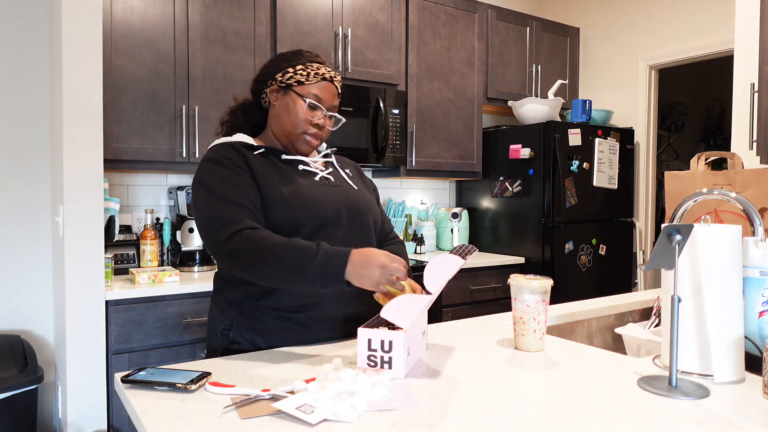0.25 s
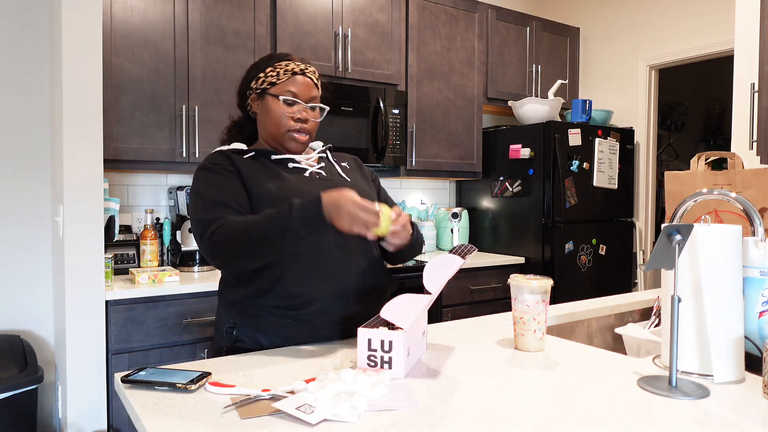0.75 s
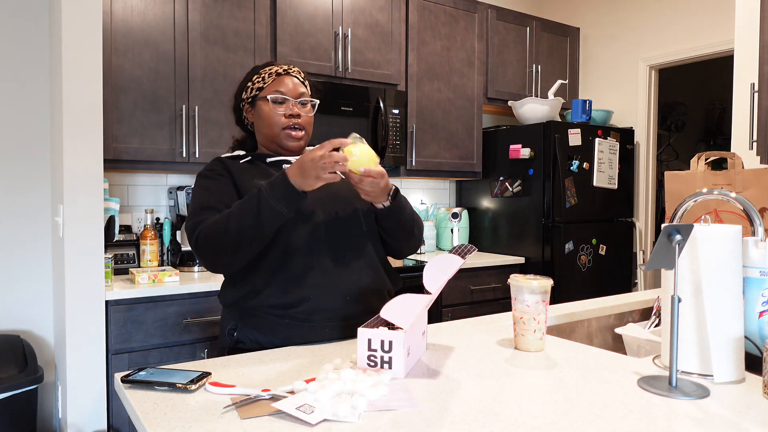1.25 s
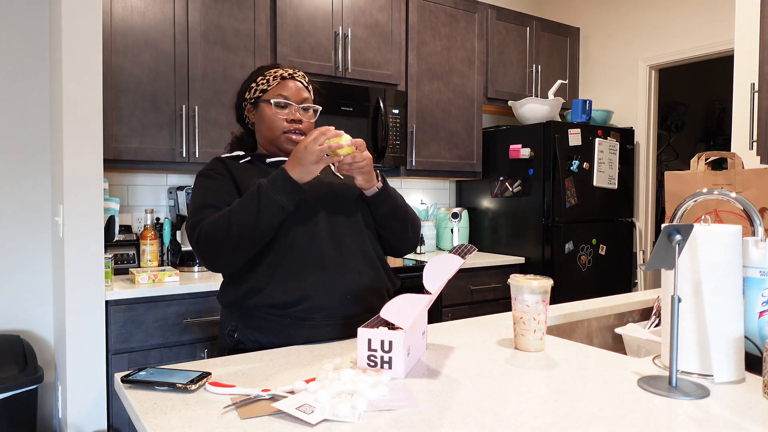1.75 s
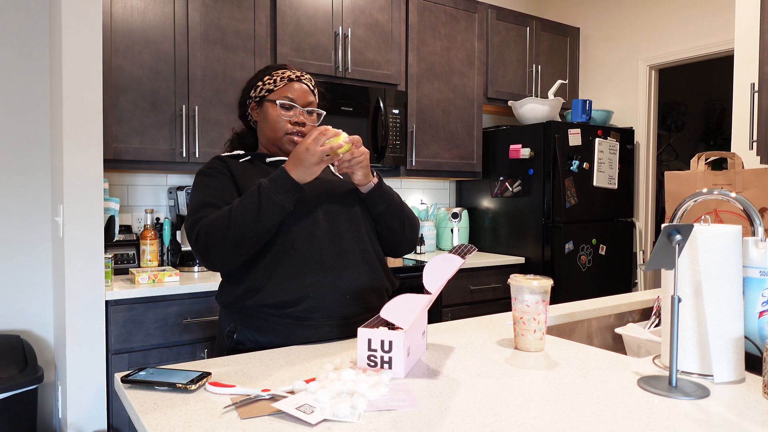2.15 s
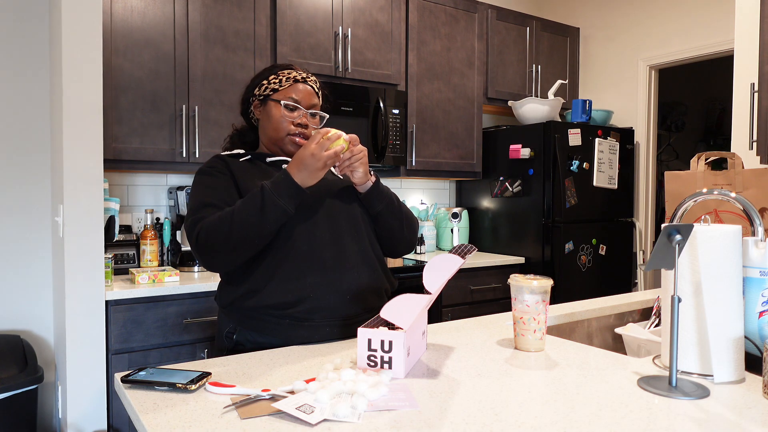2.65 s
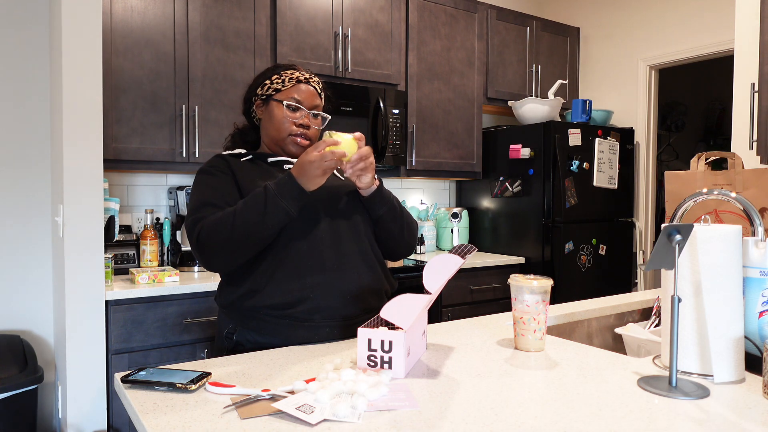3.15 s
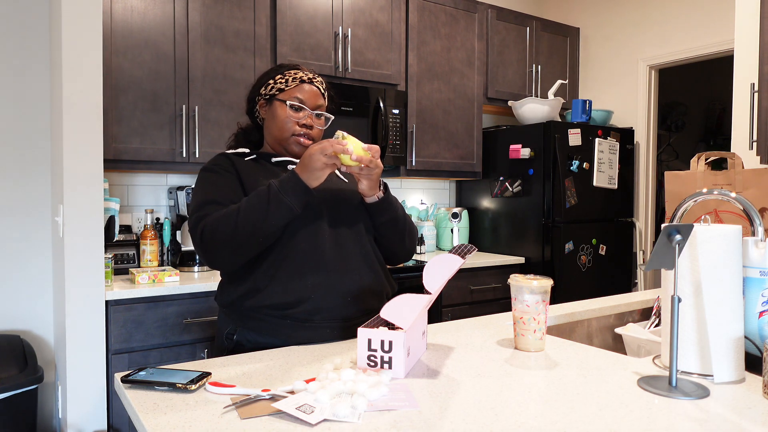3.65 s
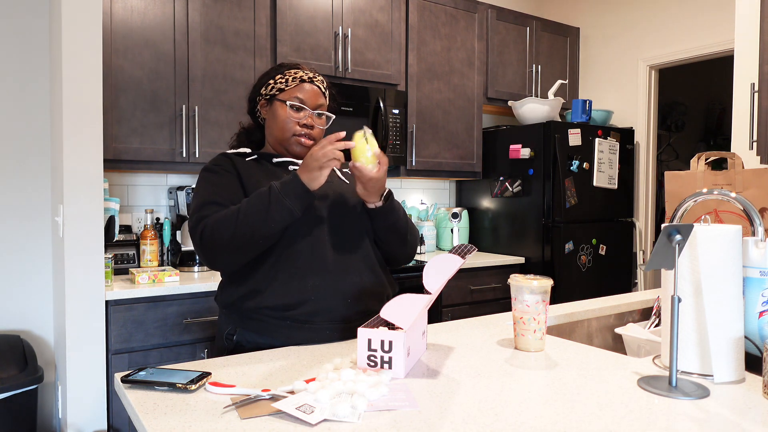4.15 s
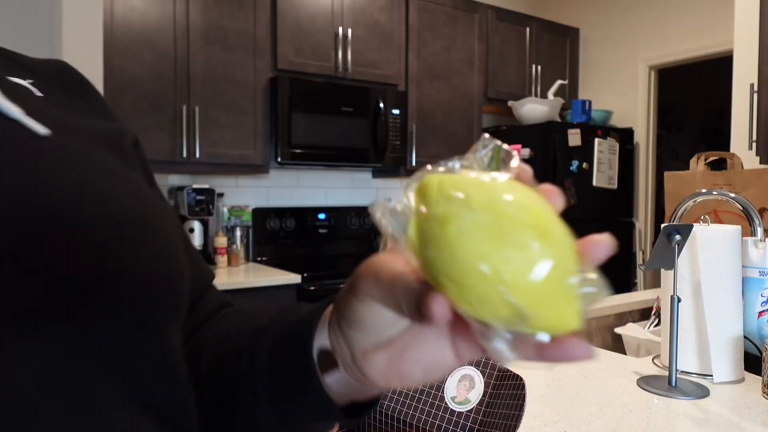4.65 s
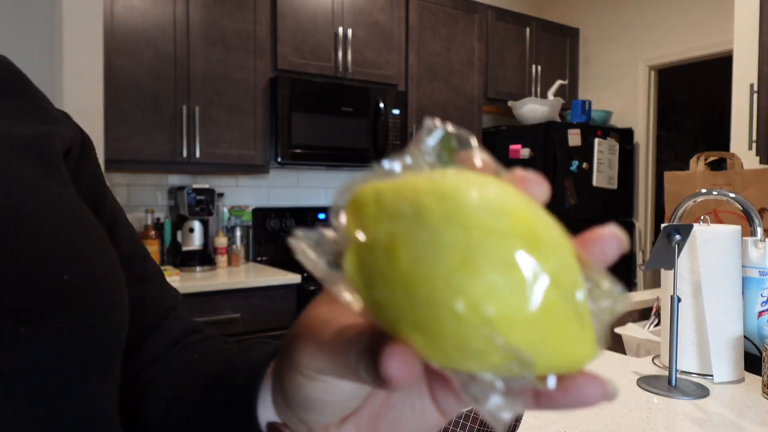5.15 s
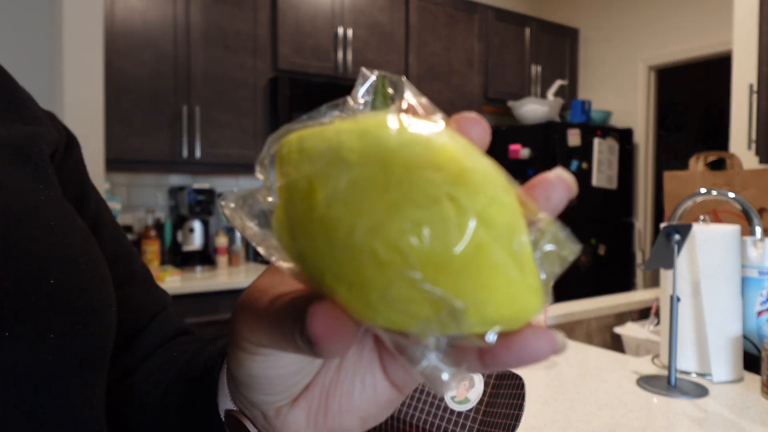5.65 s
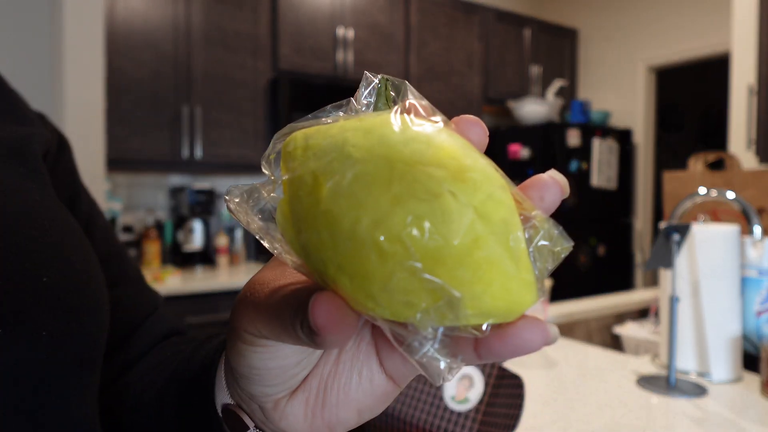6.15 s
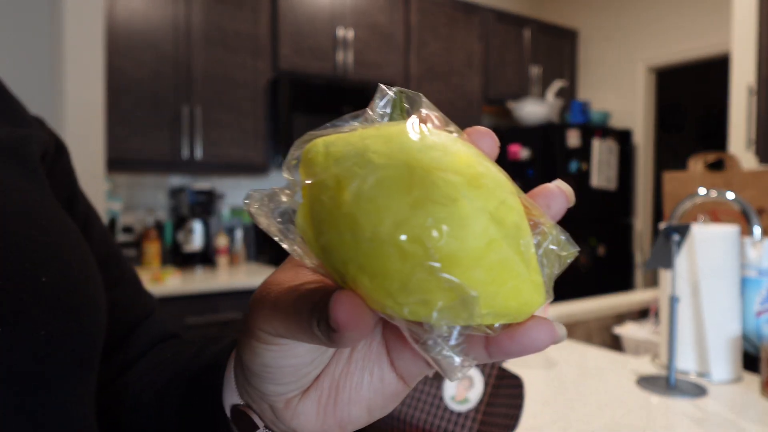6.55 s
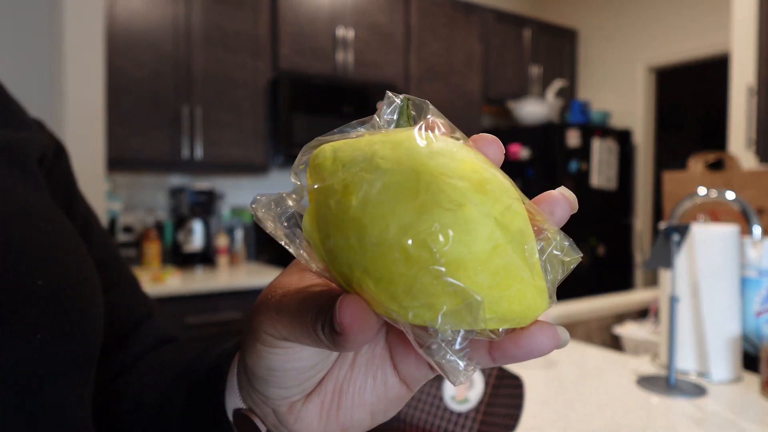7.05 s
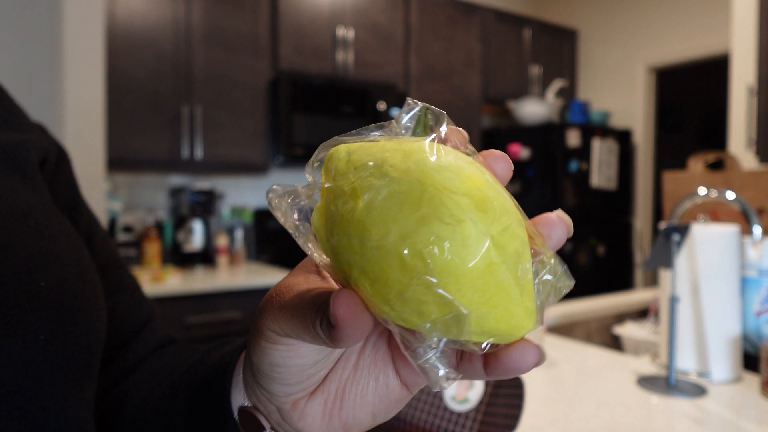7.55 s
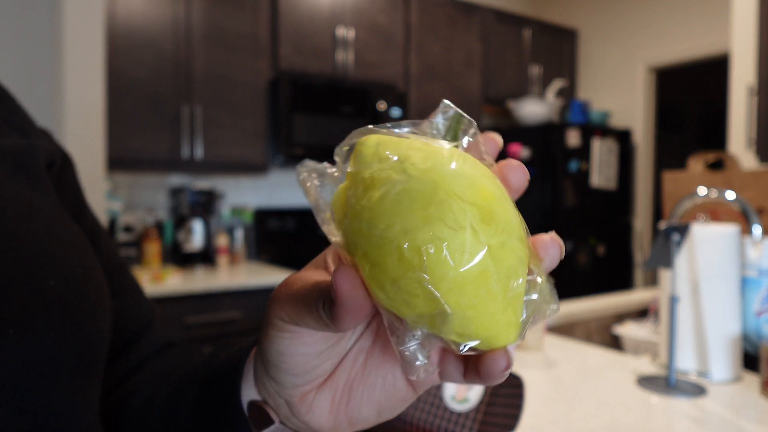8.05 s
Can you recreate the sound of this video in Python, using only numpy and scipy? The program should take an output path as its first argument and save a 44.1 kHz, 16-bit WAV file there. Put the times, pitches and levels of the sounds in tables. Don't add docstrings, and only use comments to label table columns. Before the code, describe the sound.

In a hard-walled kitchen, hands lift a soap in stiff plastic film from a cardboard box with a faint hollow knock and soft scuffs. Sharp snaps and fine crackle come in bursts, growing dense as it is turned. After an abrupt cut the wrap is close to the microphone and drier, mostly still, then crackling sparsely at the end. A refrigerator hums softly throughout.

```python
import sys
import numpy as np
from scipy import signal
from scipy.fft import rfft, irfft
from scipy.io import wavfile
from scipy.ndimage import uniform_filter1d

SR = 44100
rng = np.random.default_rng(int(sys.argv[2]) if len(sys.argv) > 2 else 0)


def how_loud(loudness_db):
    steps = np.asarray(loudness_db, float) / 20
    return 10 ** steps


def to_wav(s):
    ch = np.atleast_2d(s).T
    pcm = np.round(np.clip(ch, -1, 1) * 32767)
    wavfile.write(sys.argv[1], SR, pcm.astype(np.int16))


N = 366030

CUT_S = 4.586
LEAD_S = 0.001
DELAY_S = 0.0007
FAR_LENGTH, NEAR_LENGTH = 1.39, 1.14
SPREAD_LENGTH = 0.45
NEAR_PAN_DB = 0.6


def evened(x):
    return x / np.sqrt(np.mean(x ** 2) + 1e-20)


def read(points, hz):
    f, value = np.transpose(points)
    return np.interp(np.log(hz + 1), np.log(f + 1), value)


def filtered(x, order, hz, kind="low"):
    return signal.sosfilt(signal.butter(order, hz, kind, fs=SR, output="sos"), x)


def fuzzy_tone(hz, width):
    r = np.exp(-np.pi * width / SR)
    noise = rng.standard_normal(N) + 1j * rng.standard_normal(N)
    wander = signal.lfilter([1 - r], [1, -r], noise)
    return evened((wander * np.exp(2j * np.pi * hz * np.arange(N) / SR)).real)


def refrigerator():
    # (frequency [Hz], level per Hz [dB])
    air_colour = [(15, -79.5), (25, -41.5), (75, -32), (184, -9), (241, -8.5), (291, -9), (402, -16.5),
                  (1090, -21.5), (1310, -20), (1500, -23.5), (6450, -31.5), (13700, -39), (15700, -41.5)]
    # (frequency [Hz], likeness [0 to 1])
    likeness = [(60, 0.32), (180, 0.48), (550, 0.6), (1650, 0.54), (4970, 0.19), (15000, 1)]
    # (time [s], level [dB])
    hum_level = [
        (0.0, -62.5),
        (0.18, -64),
        (8.3, -59),
    ]
    # (frequency [Hz], width [Hz], level [dB])
    whines = [
        (125.4, 4.05, -85.5),
        (752, 6.4, -83.5),
        (1317, 16, -76.5),
        (14610, 30, -92),
    ]
    hum_hz, wobble = 240.3, 0.25

    frames, hz = N // 256 + 5, np.fft.rfftfreq(1024, 1 / SR)
    a, b, c, d, patches = rng.standard_normal((frames, 513, 5)).T
    patches = uniform_filter1d(patches, size=8, axis=0)
    patches = evened(uniform_filter1d(patches, size=14, axis=1))
    same = np.clip(read(likeness, hz), -1, 1)[:, None]
    left = a + 1j * b
    right = same * left + np.sqrt(1 - same ** 2) * (c + 1j * d)
    z = np.array([left, right]) * how_loud(read(air_colour, hz)[:, None] + patches)
    air = how_loud(-61.5) * evened(signal.istft(z, nperseg=1024, noverlap=768)[1][:, :N])

    t = np.arange(N) / SR
    hum = 1.19 * np.sin(2 * np.pi * hum_hz * t) + wobble * fuzzy_tone(hum_hz, 0.93)
    hum = hum * how_loud(np.interp(t, *np.transpose(hum_level)))
    whine = sum(how_loud(db) * fuzzy_tone(f, width) for f, width, db in whines)
    return air + hum * how_loud(np.array([[-.3], [.3]])) + whine


def box():
    # (time [s], level [dB])
    brushes = [
        (0.769, -52.5),
        (1.15, -52),
        (1.273, -60.5),
        (3.05, -57.5),
        (3.2, -54.5),
    ]
    knock_db, knock_hz, knock_t60, scuff_t60 = -51, 630, 0.91, 0.76
    t = np.arange(N) / SR
    a, b = rng.standard_normal((2, N))
    hollow = filtered([a + .5 * b, a - .5 * b], 1, [knock_hz * 0.28, knock_hz * 2.1], "band")
    knock = how_loud(knock_db - 60 * t / knock_t60) * evened(hollow)
    dull = filtered([a + 0.34 * b, 0.6 * a - 0.2 * b], 2, [420, 1500], "band")
    scuffs = sum((t > s) * how_loud(db - 60 * abs(t - s) / scuff_t60) for s, db in brushes)
    return knock + scuffs * evened(dull)


def snap_shapes(ring_hz, low_db, top_db, ring_db, stretch=1):
    t, hz = np.arange(512) / SR, np.fft.rfftfreq(512, 1 / SR) + 1
    age = np.maximum(t - LEAD_S, 0)
    noise = rng.standard_normal((len(ring_hz), 512))
    phase, length = rng.random((len(ring_hz), 2)).T[..., None]
    slow = stretch * (.8 + 0.8 * length)
    one_direction = stretch > .6

    crack = rfft(noise * (1 - np.exp(-age / .0001)) * how_loud(-60 * age / (.0038 * slow)))
    crack /= np.sqrt(uniform_filter1d(abs(crack) ** 2, size=22 if one_direction else 1, axis=1))
    low_share = np.clip(np.log2(3000 / hz) * 0.78, 0, 1)
    top_share = np.clip(np.log2(hz / 5500) * 0.51, 0, 1)
    edge_db = -14 * np.clip(np.log2(hz / 11000), 0, 1)
    crack *= how_loud(edge_db + low_share * (low_db[:, None] - 7.5) + top_share * (top_db[:, None] - 1.5))

    ring_t60 = .004 * slow * (3000 / ring_hz[:, None]) ** .7
    swing = np.sin(2 * np.pi * (ring_hz[:, None] * age + phase))
    ring = rfft((1 - np.exp(-age / .0003)) * how_loud(-60 * age / ring_t60) * swing)
    ring *= how_loud(ring_db + 3.5)[:, None] / abs(ring).max(1, keepdims=True)

    both = crack + ring if one_direction else ring * np.sqrt(1 + abs(crack / ring) ** 2)
    shapes = irfft(both) * signal.windows.tukey(512, .15)
    shapes = filtered(shapes, 4, 1300, "high")
    return shapes / abs(signal.hilbert(shapes)).max(1, keepdims=True)


def crackle():
    # (time [s], level [dB])
    motion = [(0.0, -50), (0.5, -64), (0.7, -54), (0.8, -39.5), (1.1, -42), (1.3, -53.5), (1.93, -50),
              (1.98, -35), (2.17, -62), (2.34, -66.5), (2.74, -65.5), (2.97, -42.5), (3.16, -42),
              (4.18, -44.5), (4.51, -59.5), (4.61, -40.5), (4.8, -50), (5.0, -59.5)]
    # (frequency [Hz], level per Hz [dB])
    film = [(240, -56), (400, -24.5), (893, -14), (1900, 9), (2670, 7.5), (3370, 6.5), (8900, -2),
            (13500, -27.5), (16000, -25.5)]
    per_s, spread_db, kinds = 1500, 6.0, 16
    size = how_loud(spread_db * np.minimum(rng.exponential(1, N), 3)) * (rng.random(N) < per_s / SR)
    kind = rng.integers(0, kinds, N)
    hz = np.geomspace(1200, 14000, kinds)
    shapes = snap_shapes(hz, 0 * hz, 0 * hz, 0 * hz + 12)
    x = sum(signal.oaconvolve(size * (kind == k), shape)[:N] for k, shape in enumerate(shapes))

    power = (abs(rfft(shapes, 1024)) ** 2).mean(0)
    bins = np.fft.rfftfreq(1024, 1 / SR)
    colour = how_loud(read(film, bins)) / np.sqrt(uniform_filter1d(power, size=40))
    x = evened(signal.oaconvolve(x, signal.firwin2(255, bins, colour, fs=SR), "same"))
    top = filtered(x, 2, 7000, "high")
    rub = filtered(rng.standard_normal(N), 2, [380, 850], "band")
    x = x + how_loud(-20.5) * evened(rub)

    t = np.arange(N) / SR
    db = np.interp(t, *np.transpose(motion), right=-120)
    top_db = np.where(t < CUT_S, -7.5, -9) + 1.6157 * (db + 51.0)
    return how_loud(db - 8.5) * (x + (how_loud(top_db) - 1) * top)


def creases(rows, low_db, top_db, ring_db):
    s, db, hz = np.transpose(rows)[:3]
    ring_db = ring_db + 2.5 * np.log2(4000 / hz) - 0.26 * (top_db + 30.0)
    return np.transpose([s + DELAY_S, db, hz, low_db + 0 * s, top_db, ring_db])


def rings(rows):
    s, db, hz = np.transpose(rows)
    return np.transpose([s + DELAY_S, db - 5.5, hz, 0 * s, 0 * s - 12, 0 * s + 24])


def neighbours(rows, count):
    after_s, after_db, spread_db, octaves = .007, -13.5, 15.5, 0.58
    rows = np.repeat(rows, count, axis=0)
    wait, weaker, size, tone = rng.random((len(rows), 4)).T
    later = .002 - after_s * np.log(1 - wait)
    softer = after_db - spread_db * weaker
    step = np.transpose([later, softer, 0 * wait, -10 * tone, 9 * (size - .5), 0 * wait])
    pitch = 2 ** (octaves * (2 * size[:, None] - 1))
    return (rows + step) * np.where(np.arange(6) == 2, pitch, 1)


def far_creases():
    # (time [s], peak level [dB], ring frequency [Hz],
    # brightness [dB])
    large_creases = [(0.0084, -27, 6100, -14), (0.014, -22, 7700, -10.5), (0.117, -38, 3910, -19),
                     (0.213, -27, 8000, -7), (0.3348, -26, 7460, -14), (0.377, -34.5, 3300, -15),
                     (0.507, -38.5, 2250, -23), (0.612, -51, 3090, -3), (0.6515, -29.5, 3630, -15),
                     (0.701, -32, 3840, -47), (0.7128, -30, 4710, -16), (0.731, -21.5, 6850, -27),
                     (0.7354, -20.5, 3720, -28), (0.7682, -15.5, 4500, -30), (0.779, -15, 2220, -15),
                     (0.8083, -15.5, 3760, -14.5), (0.842, -16, 5360, -17), (0.8619, -14, 4500, -21.5),
                     (0.891, -22, 4860, -11), (0.9019, -16.5, 3900, -15), (0.9246, -31.5, 3920, -11),
                     (0.9472, -12.5, 6500, -18.5), (1.0164, -15, 5400, -22), (1.0594, -25, 2330, -12),
                     (1.112, -29, 3400, -26.5), (1.1222, -20, 5500, -13.5),
                     (1.1504, -12.5, 5020, -28), (1.157, -25, 6000, -7), (1.1927, -12.5, 5100, -20.5),
                (1.2442, -19, 4360, -32), (1.246, -21.5, 3280, -28), (1.262, -22, 4260, -20),
                (1.2746, -8, 7850, -8.5), (1.2834, -32, 7800, -14.5), (1.4585, -19, 4560, -19),
                (1.4691, -16, 4000, -14), (1.5209, -27, 5700, -10), (1.583, -17.5, 5850, -21),
                (1.6262, -17.5, 3260, -19.5), (1.6309, -20, 4040, -42), (1.699, -27, 3660, -24),
                (1.7314, -16, 5400, -25), (1.736, -27, 10100, -12), (1.905, -25, 3630, -24),
                (1.9658, -15.5, 3750, -19), (1.97, -15, 3580, -16), (2.0656, -18.5, 6050, -21),
                (2.1599, -29.5, 2580, -23), (2.217, -34, 6400, -13), (2.2501, -22.5, 8150, -3),
                (2.2754, -29, 4000, -18), (2.4355, -35, 3850, -6), (2.604, -40, 4440, -10),
                     (2.7037, -36, 4080, -13), (2.752, -27, 5440, -19), (2.8057, -21.5, 4300, -17.5),
               (2.819, -23, 4220, -13), (2.845, -21, 5230, -24), (2.898, -22, 4410, -15),
               (2.9504, -20, 4510, -17), (2.9873, -15, 5340, -23), (3.0175, -16.5, 5670, -24),
               (3.0297, -17, 4450, -22.5), (3.039, -19.5, 6900, -8.5), (3.0518, -10, 5370, -17),
               (3.059, -25.5, 5300, -14), (3.109, -19.5, 3890, -29), (3.1345, -14, 5620, -18.5),
               (3.141, -15, 8560, -10), (3.158, -17.5, 9300, -11), (3.1798, -8.5, 5800, -0.5),
               (3.1834, -15.5, 9100, -11.5), (3.2157, -12.5, 6500, -7.5), (3.22, -23.5, 6760, -5),
               (3.271, -20, 1980, -31.5), (3.2911, -13, 3150, -15.5), (3.295, -18, 3180, -5),
               (3.316, -20.5, 3280, -6), (3.3484, -24, 7040, -23), (3.371, -21, 3500, -13),
               (3.3963, -17, 3520, -27), (3.4, -14.5, 2945, -16.5), (3.4131, -9.5, 6200, -14.5),
               (3.5128, -11, 6620, -14),
                     (3.5689, -14, 8400, -7.5), (3.587, -17.5, 4670, -24), (3.6115, -17, 3680, -9),
               (3.617, -27, 6240, -4), (3.6239, -10.5, 2670, -11.5), (3.725, -20, 6600, -11),
               (3.731, -19.5, 4630, -20), (3.745, -27, 5000, -7), (3.761, -24, 3060, -23),
               (3.7845, -15, 4900, -18), (3.806, -31, 6050, -14), (3.817, -18.5, 4840, -8),
               (3.86, -21, 7360, -8), (3.865, -31.5, 6750, -16.5), (3.884, -30.5, 4200, -13.5),
               (3.8894, -14.5, 4150, -9), (3.9043, -14.5, 7680, -18), (3.931, -19, 5100, -12.5),
               (3.9658, -16, 5670, -13.5), (4.0213, -17.5, 5600, -10.5), (4.0296, -12, 6200, -17),
               (4.0516, -11.5, 4240, -20), (4.0692, -15.5, 5800, -14), (4.117, -27, 4640, -22.5),
               (4.181, -21.5, 4430, -20.5), (4.2234, -18.5, 3080, -19.5), (4.2537, -19.5, 3500, -16),
               (4.258, -27, 5200, -13.5), (4.297, -18, 5740, -15.5), (4.319, -17, 3510, -16.5),
               (4.3396, -26.5, 3680, -8.5), (4.3994, -13.5, 3670, -9.5), (4.4259, -14.5, 3600, -11),
               (4.55, -25, 3560, -38)]
    # (time [s], peak level [dB], ring
    # frequency [Hz], brightness [dB])
    small_creases = [(0.0198, -56, 2330.0, -3), (0.0258, -27, 3640, -9), (0.0768, -33, 7660, -17),
                     (0.2804, -41, 1440, -16), (0.3515, -46, 4100, -11), (0.41, -40, 2760.0, -19),
                     (0.4723, -45, 4270, -18.0), (0.479, -43, 6330.0, -14.0), (0.613, -40, 4070, -35),
                     (0.6423, -41, 3830.0, -25), (0.674, -53, 2330.0, -23.0), (0.7183, -27, 4700, -29),
                     (0.998, -38, 6200.0, -19.0), (1.161, -29, 5830, -16), (1.282, -21, 8960.0, -10.5),
                     (1.3, -22, 8440, -13.5), (1.3173, -22, 6760.0, -14), (1.4715, -18, 4040, -13),
                     (1.569, -33, 4260, -17), (1.8765, -55, 3490.0, -25.0), (1.962, -26, 3730, -27.0),
                     (2.0283, -21, 4180.0, -19), (2.05, -33, 3530, -24.0), (2.081, -29, 3770, -29),
                     (2.232, -45, 5300.0, -15), (2.482, -44, 6680.0, -15.0), (2.534, -44, 4390.0, -24.0),
                     (2.61, -52, 5120.0, -21),
                     (2.6906, -39, 10420.0, -5.5), (2.695, -48.5, 7580.0, -8), (2.7089, -38, 6400, -16.0),
                  (2.7188, -41.5, 4260.0, -17.0), (2.7676, -28, 5800, -13), (2.8034, -29, 5380.0, -23.5),
                  (2.8278, -24, 3840, -11), (2.8406, -20, 5160, -14), (2.91, -26.5, 4570, -34),
                  (2.9133, -27.5, 4200, -31), (2.9666, -25, 5800, -18.0), (2.973, -33, 5080.0, -16),
                  (3.1017, -30.5, 3940, -26.5), (3.122, -20, 3920.0, -10), (3.1694, -22.5, 9000, -6.5),
                  (3.1862, -11.5, 8350, -7.5), (3.392, -26, 2900, -21.0), (3.4079, -14.5, 2020, -14.5),
                  (3.4741, -19, 2970, -15), (3.496, -26, 3020, -20), (3.5215, -20, 6400, -13.5),
                  (3.5557, -24, 8700, -18), (3.7774, -23, 3960.0, -4), (3.792, -32, 4820.0, -8),
                  (3.8996, -23.5, 4630, -13.5), (3.9898, -21, 4580, -12), (3.9997, -24, 3320.0, -11.5),
                  (4.0227, -19.5, 7150, -18), (4.0622, -30, 5730.0, -18), (4.082, -29, 5320, -15.5),
                  (4.1565, -30, 6290.0, -11), (4.1697, -30, 4560, -23.5), (4.214, -21, 6120.0, -14),
                  (4.2387, -31, 3290, -21.5), (4.2782, -28.5, 4600, -5), (4.433, -31.5, 3710, -12),
                  (4.4494, -24.5, 3890, -6.5), (4.558, -32, 3060.0, -26)]
    # (time [s], peak level [dB], ring frequency [Hz])
    second_patches = [(.8086, -28, 9000), (.842, -19, 2550), (.9246, -19, 11400), (.9479, -20, 3280),
                      (1.0162, -19, 1880), (1.2748, -4.5, 8800), (1.2748, -6, 11000), (1.2758, -11.5, 5080),
                      (1.6262, -16, 7000), (2.9872, -20, 2040), (3.1797, -14, 8950), (3.1797, -10, 6160),
                      (3.1843, -15, 3240), (3.272, -18, 7860), (4.3191, -9.5, 3620), (4.3409, -17.5, 9250),
                      (4.3996, -4.5, 3300), (4.4264, -11, 3500), (3.5131, -11.5, 4240), (1.7312, -22, 1740),
                      (4.3996, -8.5, 4300)]
    low_db, ring_db = -1.5, 7
    large = np.array(large_creases)
    large = creases(large, low_db, 10.5 + 1.26 * large[:, 3], ring_db)
    ticks = np.array(small_creases)
    ticks = creases(ticks, low_db, 10.5 + 1.26 * ticks[:, 3], ring_db)
    return np.vstack([large, ticks, rings(second_patches), neighbours(large, count=4)])


def spits():
    # (time [s], peak level [dB], ring frequency [Hz])
    patches = [(.7655, -31, 13000), (.8155, -27, 7000), (.857, -18, 6000), (.8645, -20, 13000),
               (.8695, -20, 5000), (2.7523, -28, 14000), (2.9873, -22.5, 14000), (4.2782, -24, 14000),
               (4.6, -19, 13800), (4.615, -22, 14000), (5.2916, -31, 2600), (8.0229, -21, 14000),
               (8.2177, -11.5, 14000)]
    return snaps(rings(patches), 0, NEAR_PAN_DB, FAR_LENGTH)


def near_creases():
    # (time [s], peak level [dB], ring frequency
    # [Hz], brightness [dB], low part [dB])
    close_creases = [(4.6, -5.5, 6140, -18.5, 1), (4.615, -15.5, 4170, -24, 14), (4.6215, -23, 2560, -25, 2),
                     (4.6686, -22, 2697, -16, 11), (4.71, -26, 2820, -39, 12), (4.7236, -23.5, 4460, -19, 4),
                     (4.7423, -32, 2320, -19, 12), (4.787, -34, 1640, -23, 14), (4.7952, -30.5, 5114, -39, 10),
                     (4.8849, -38, 5600, -15, -8), (4.897, -44, 2000, -9, -6), (5.0086, -40.5, 4750, -23, -4),
                     (5.059, -41.5, 4110, -8, 16.5), (5.2915, -16, 3570, -6.5, -4), (5.9814, -46, 1306, -45, 7.5),
                     (6.043, -31, 3800, -32.5, 6.5), (6.2885, -39, 2530, -32.5, 22),
                     (6.7135, -23.5, 8600, -10, -11), (6.86, -25.5, 5330, -20, 6.5), (7.42, -44, 3820, -10, -14),
                     (7.6097, -42, 3570, -35.5, 18), (7.6561, -28.5, 5680, -4, -4), (7.6752, -33, 6850, 3, -4),
               (7.6813, -17.5, 3660, -31, 1), (7.7072, -15.5, 2560, 6, 10), (7.7133, -22.5, 2140, -44, 18),
               (7.7199, -16, 1680, 6, -5), (7.7276, -24, 5500, -18, 8), (7.7313, -15, 3830, -14, 7),
               (7.817, -27, 5000, -21, 16), (7.8718, -13.5, 4680, 0, 5), (7.9814, -13, 7840, -2, -1),
               (8.0229, -16.5, 2380, -13, -2), (8.1059, -34, 2700, -38, 5), (8.1319, -14.5, 6200, -21, -28),
               (8.14, -17.5, 6400, -7, -24), (8.1538, -14, 2700, -16, 8.5), (8.16, -28, 3980, -22, 3),
               (8.1858, -14, 3270, 0, 10), (8.2178, -7.5, 5900, -3, 1), (8.2664, -22, 5060, -23, 10)]
    # (time [s], peak
    # level [dB], ring frequency [Hz])
    second_patches = [(4.6, -14, 1620), (4.6, -11, 3590), (4.6034, -24, 2280), (4.6147, -17, 1760),
                      (4.7238, -21, 6900), (4.7461, -35, 1640), (4.7878, -32, 1445), (4.8968, -46, 1990),
                      (5.2524, -51, 2020), (5.9817, -36.5, 1350), (6.86, -24, 8160), (6.86, -42.5, 2410),
                      (7.7202, -26, 6115), (7.7074, -8.5, 2640), (7.7311, -19.5, 1760), (7.8721, -8, 12570),
                      (7.9017, -24.5, 4560), (7.9821, -23, 3905), (8.0229, -8, 2370), (8.1324, -31, 2370),
                      (8.141, -9, 7260), (8.1539, -16, 4480), (8.1604, -21, 2200), (8.1858, -20, 6350),
                      (8.2023, -44, 2070), (8.2176, -16, 2100), (8.2478, -25, 9800), (8.2665, -26, 2270)]
    held = np.array(close_creases)
    return np.vstack([creases(held, held[:, 4], held[:, 3], 9), rings(second_patches)])


def snaps(rows, gain_db, pan_db, stretch=1):
    s, db, hz, low_db, top_db, ring_db = np.transpose(rows)
    out = np.zeros((2, N + 512))
    at = np.round((s - LEAD_S) * SR).astype(int)[:, None] + np.arange(512)
    pan = pan_db * rng.uniform(-0.8, 1, len(s))
    shapes = how_loud(db + gain_db)[:, None] * snap_shapes(hz, low_db, top_db, ring_db, stretch)
    body = filtered(shapes, 1, 9000)
    for ear, sign in zip(out, (1, -1)):
        np.add.at(ear, at, shapes + (how_loud(sign * (pan - 0.5)) - 1)[:, None] * body)
    return out[:, :N]


def around(rows, gain_db):
    pure = (rows[:, 5:] > 23) * (np.arange(6) == 1)
    return snaps(rows - 3 * pure, gain_db, 0, SPREAD_LENGTH)


def counter(x):
    lag = round(0.005 * SR)
    bounce = np.pad(filtered(x.mean(0), 1, 11000), (lag, 0))[:N]
    return x + how_loud(np.array([-10, -13]))[:, None] * bounce


def kitchen(room_db, echo_db, fill_s):
    # (delay [s], left level [dB], right level [dB])
    echoes = [
        (.0075, -24, -3),
        (0.013, -27, -31),
        (0.017, -32, -32),
        (0.03, -12.5, -7),
        (.036, -21.5, -10.5),
    ]
    # (frequency [Hz], time to fall 60 dB [s])
    decay = [(700, 0.72), (2000, 0.43), (5000, 0.49), (10000, 0.5), (16000, 0.68)]
    # (frequency [Hz], side against middle [dB])
    width = [(700, -3), (3000, -13), (15000, -17)]
    taps = rng.choice([-1., 0, 0, 1.], (2, SR // 2)) * (np.arange(SR // 2) > .2 * fill_s * SR)
    hz, t, (mid, side) = signal.stft(taps, SR, nperseg=256)
    side = side * how_loud(read(width, hz))[:, None]
    z = np.array([mid + side, mid - side])
    z = z / np.sqrt(1 + (hz[:, None] / 12500) ** 2)
    swell = np.minimum(t / fill_s, 1)
    fall = how_loud(-60 * t / read(decay, hz)[:, None])
    tail = signal.istft(z * swell * fall, SR, nperseg=256)[1]
    tail *= how_loud(room_db) / np.linalg.norm(tail[0])
    for s, left_db, right_db in echoes:
        tail[:, round(s * SR)] += how_loud(np.array([left_db, right_db]) + echo_db)
    return tail


def thrown_back(x, room_db, echo_db, fill_s):
    turn = 2 * np.pi * 3.1 * np.arange(N) / SR
    wet = 0
    for k in range(3):
        share = np.sqrt(2 / 3) * abs(np.cos(turn + k * np.pi / 3))
        path = kitchen(room_db, echo_db - 10.5, fill_s)
        wet = wet + signal.fftconvolve((x.mean(0) * share)[None], path, axes=1)[:, :N]
    return wet


def scene():
    fade_s = 0.011
    to_cut = CUT_S - np.arange(N) / SR
    before, after = np.clip(to_cut / fade_s, 0, 1), np.clip(-to_cut / fade_s, 0, 1)
    fine = crackle()
    far_fine, near_fine = fine * (to_cut > 0), fine * (to_cut <= 0)

    rows = far_creases()
    far = snaps(rows, -0.4, 1.1, FAR_LENGTH) + far_fine
    far_wet = thrown_back(around(rows, 3.93) + far_fine, room_db=-5, echo_db=-14, fill_s=0.0011)

    rows = near_creases()
    near = snaps(rows, 0.077, NEAR_PAN_DB, NEAR_LENGTH) + near_fine
    near_wet = thrown_back(around(rows, 2.16) + near_fine, room_db=-12.5, echo_db=-4, fill_s=0.033)

    handling = (counter(far) + far_wet) * before + near + near_wet + counter(spits())
    hum = refrigerator() * (0.16 + 0.98 * (before + after))
    return handling + hum + box()


def low_pass(x):
    return signal.sosfilt(signal.butter(12, 16990, fs=SR, output="sos"), x)


def record(dry):
    edge_hz, top_hz = 15870, 16600
    dry = filtered(dry, 2, 40, "high")
    dry = signal.oaconvolve(dry, signal.firwin(127, top_hz, window=("kaiser", 8), fs=SR)[None], "same")
    low = signal.oaconvolve(dry, signal.firwin(2047, edge_hz, window=("kaiser", 8), fs=SR)[None], "same")
    power = (dry ** 2).mean(0)
    usual = uniform_filter1d(power, size=1500) + 3e-6
    attack = uniform_filter1d(power, size=60) > how_loud(23) * usual
    gate = np.minimum(uniform_filter1d(attack * 1., size=200) * 8, 1)
    mix = (low + gate * (dry - low)) * how_loud(np.array([[-.3], [.3]]))
    return low_pass(mix)


dry = scene()
out = record(dry)
to_wav(out)
```